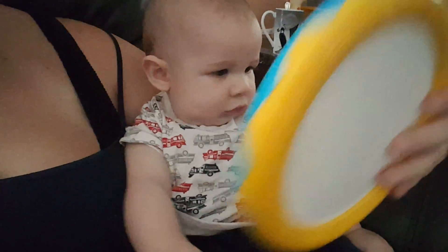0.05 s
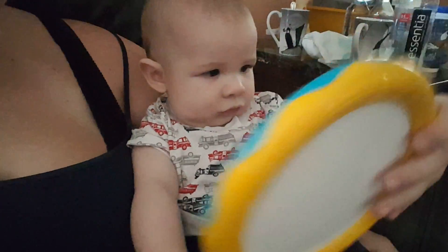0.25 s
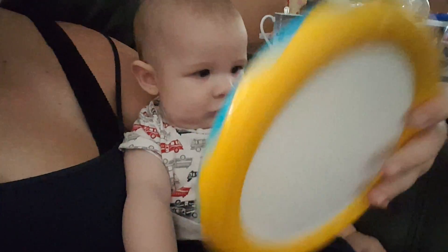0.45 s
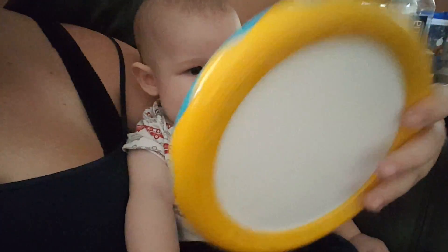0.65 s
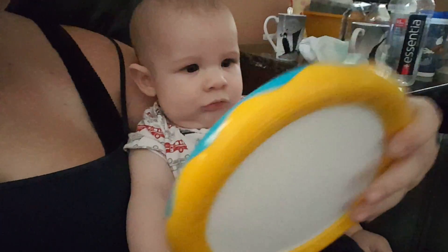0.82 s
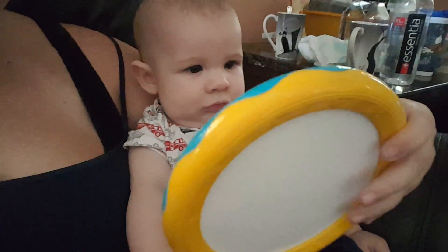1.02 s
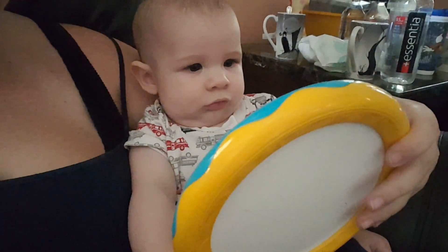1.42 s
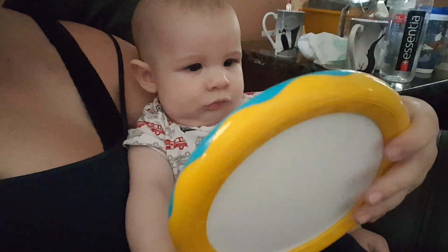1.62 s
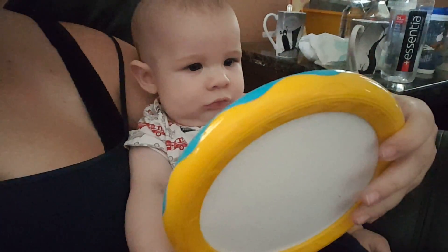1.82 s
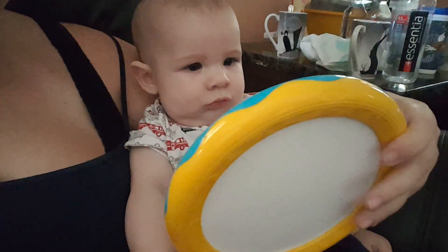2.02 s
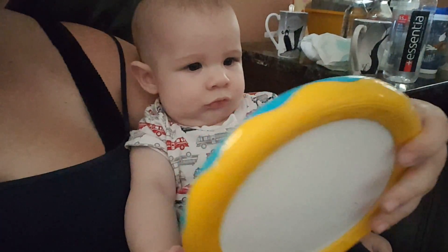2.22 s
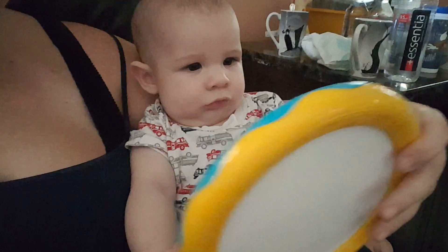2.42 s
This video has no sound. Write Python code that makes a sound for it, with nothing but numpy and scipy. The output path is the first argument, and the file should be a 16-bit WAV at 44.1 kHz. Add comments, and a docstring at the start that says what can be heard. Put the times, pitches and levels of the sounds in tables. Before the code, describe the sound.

A plastic toy rattle is shaken three times close to the microphone, its small beads swishing and pattering against the shell. The beads settle, leaving a quiet small room with a faint appliance hum.

```python
"""A drum-shaped plastic toy rattle is lifted close to the microphone; its beads shift and a few click.
Three shakes follow within a second. Each throws a shower of small beads across the shell: their impacts
excite its modes as a patter, merge into a hiss at full speed and drum on the head as the heap lands.
The toy is then held still and the last beads trickle into place. The small room's reverberation dies
away, leaving the air noise and appliance hum that sound throughout."""
import sys
import numpy as np
from scipy import signal
from scipy.fft import rfft, irfft, next_fast_len
from scipy.io import wavfile
from scipy.ndimage import map_coordinates

SR = 44100
rng = np.random.default_rng(int(sys.argv[2]) if len(sys.argv) > 2 else 0)


def to_wav(s):
    """Save 16-bit WAV."""
    ch = np.atleast_2d(s).T  # columns
    pcm = np.round(np.clip(ch, -1, 1) * 32767)  # PCM
    wavfile.write(sys.argv[1], SR, pcm.astype(np.int16))


N = 112454

# Envelopes of the bead showers: time_s, relative_level_db
LIFT_ENVELOPE = [(0, -56.5), (0.019, -48.5), (.04, -57.5), (.08, -56), (.14, -59)]
PATTER_ENVELOPE = [(.141, -70), (.144, -42), (.16, -45), (.208, -35.5), (.27, -30), (.282, -25.5),
                   (.318, -22.5), (.372, -30), (.41, -38), (.44, -41), (.512, -33.5), (.566, -27.5),
                   (.634, -36.5), (.67, -47), (.716, -56), (.719, -44), (.756, -37), (.805, -31),
                   (.865, -32), (.89, -39.5), (.935, -45), (.968, -53), (.988, -48), (1.035, -62)]
HISS_ENVELOPE = [(.144, -62), (.21, -50), (.294, -28), (.336, -34), (.385, -43), (.415, -53), (.47, -53),
                 (.52, -45), (.565, -34.5), (.635, -51), (.705, -70), (.765, -50), (.82, -37), (.845, -40),
                 (.895, -53), (.925, -55), (.965, -67), (1.03, -78)]
SETTLING_ENVELOPE = [(1.021, -61.5), (1.1, -67), (1.15, -62), (1.22, -67)]
# Landings of the heap on the head: peak_s, relative_level_db
HEAD_LANDINGS = [(.332, -32), (0.611, -38.5), (.845, -42)]
# Clicks of stray beads: start_s, relative_level_db
STRAY_CLICKS = [(0.0128, -40), (0.072, -45.5), (0.142, -44), (.153, -46.5), (0.3253, -24), (.362, -26),
                (0.3939, -36), (0.4297, -28.5), (.4445, -35), (0.9056, -31.5), (0.9305, -46), (0.9892, -45),
                (1.001, -49.5)]
# Spectra of the four kinds of contact: frequency_hz, relative_level_db
PATTER_SPECTRUM = [(200, -28), (600, -9.5), (1100, -4.5), (1450, -0.5), (1900, -1.5), (3000, -0.5),
                   (4000, -5.5), (5600, -9), (7200, -15), (10000, -23), (15000, -54)]
HISS_SPECTRUM = [(1500, -24), (3500, 2.5), (5500, 1.5), (7500, -4.5), (8600, -5), (10000, -7), (11500, -7),
                 (13200, -3.5), (15500, -16.5)]
HEAD_SPECTRUM = [(100, -27), (220, -6), (430, -3), (520, 0.5), (660, 5.5), (900, -1), (1100, -13.5),
                 (1400, 0.5), (2500, -36)]
CLICK_SPECTRUM = [(300, -25), (1400, -14), (3200, -13), (4400, 0), (5400, 1), (7000, -5), (10000, -7),
                  (13000, -5), (15500, -11)]
# Normal modes of the shell: pitch_hz, t60_s, relative_level_db
SHELL_MODES = [(668, 0.05, -0.5), (860, .15, -2), (888.5, 0.2, 2), (1339, 0.18, -1.5), (1420, 0.069, -5),
               (1510, .08, -9), (1659, .12, -29), (2390, 0.24, 0.5), (2670, 0.21, -11.5), (3000, .08, -23),
               (3420, .12, -9), (4440, 0.12, -3), (4730, .08, -9), (5450, 0.082, 1)]
# Likeness at the two microphone ports: frequency_hz, correlation (clipped to -1..1 in use)
RATTLE_CORRELATION = [(200, 1.6), (1400, 0.45), (3300, 0.4), (4300, 0.6), (5300, .5), (6500, -0.14),
                      (15000, -0.05)]
AIR_CORRELATION = [(50, 1), (110, 0.71), (200, 1), (400, -0.008), (700, 0.23), (1300, -0.43), (2400, 0.14),
                   (8000, -0.069)]
# Phase of the rattle between the ports: frequency_hz, left_lead_rad
PORT_PHASE = [(100, -1.5), (700, -0.96), (1000, 1.04), (1550, -0.65), (1850, 3.5), (2700, 3), (3200, 4.5),
              (4200, 4.5), (4900, 8), (6500, 6.5)]
# Balance of the rattle between the ports: frequency_hz, left_minus_right_db
PORT_BALANCE = [(300, 6), (800, 0.5), (1300, 4), (1700, -3), (2800, -4.5), (3700, -4), (4400, -6.5),
                (6200, -5.5), (7500, -2.5), (10000, 1.5), (13500, -3)]
# Reverberation time of the room: frequency_hz, t60_s
ROOM_DECAY = [(200, 0.46), (2000, 0.14), (12000, 0.13)]
# Spectrum of the room air: frequency_hz, relative_level_db
AIR_SPECTRUM = [(20, -16), (35, -34), (52, -12), (85, -11), (126, -12.5), (178, -9.5), (281, -12),
                (340, -6.5), (410, -17), (537, -18.5), (648, -14), (760, -17.5), (1020, -17), (1160, -23.5),
                (1800, -27.5), (2600, -29.5), (3400, -37), (4500, -38.5), (5900, -38), (6400, -43),
                (9000, -42), (10300, -48), (13000, -47), (15500, -50)]
# Partials of the appliance: pitch_hz, level_db, waver_ratio
HUM_PARTIALS = [(57.5, -61, 0.3), (121, -63, 0.3), (174.7, -62, 1), (316, -51.5, 0.27), (640, -61, 0.41)]


def rattle():
    """Superposition: all bead impacts drive one shell, heard a little to the right."""
    body = shell()
    clumps_db = 0.98 * wobble(knots_per_s=220)  # beads arrive in small clumps
    patter = shower(body, PATTER_SPECTRUM, PATTER_ENVELOPE, per_s=4000, scatter_db=3.5,
                    gain_db=0.5 + clumps_db)
    hiss = shower(body, HISS_SPECTRUM, HISS_ENVELOPE, per_s=6000, scatter_db=6.5, gain_db=4 + clumps_db)
    shifting = shower(body, PATTER_SPECTRUM, LIFT_ENVELOPE, per_s=8900, scatter_db=4)
    settling = shower(body, PATTER_SPECTRUM, SETTLING_ENVELOPE, per_s=2100, scatter_db=2)
    beads = patter + hiss + drumming(body) + shifting + settling + stray_beads(body)
    return microphone_ports(beads)


def shower(body, spectrum, envelope, per_s, scatter_db, gain_db=0):
    """Shot noise: faster beads strike harder and more often, per_s times a second at reference_db."""
    reference_db, still_db = -30, -100
    crowding = .6  # exponent relating contact rate to motion
    time_s, level_db = np.transpose(envelope)
    motion_db = np.interp(np.arange(N) / SR, time_s, level_db, still_db, still_db) - reference_db
    chance = np.clip(per_s / SR * amp(crowding * motion_db), 0, 1)
    strengths = unit(amp(scatter_db * np.clip(rng.standard_normal((2, N)), -2, 2)))
    strengths *= rng.choice([-1, 1], (2, N))
    hits = (rng.random((2, N)) < chance) * strengths / np.sqrt(chance)  # unit power at any rate
    hits *= amp(reference_db + gain_db + motion_db)
    return through(flutter(hits), contact(spectrum, body))


def drumming(body, rise_s=.085, fall_s=0.12, depth_db=19.5):
    """Impact excitation: after each throw the heap pours onto the head with a hollow swell."""
    swells = []
    for peak_s, db in HEAD_LANDINGS:
        swells += [(peak_s - rise_s, db - depth_db), (peak_s, db), (peak_s + fall_s, db - depth_db)]
    return shower(body, HEAD_SPECTRUM, sorted(swells), per_s=3300, scatter_db=5)


def stray_beads(body, rise_s=.0005, t60_s=.012):
    """Transient excitation: a lone bead chatters on the shell in a bright, decaying noise burst."""
    bursts = np.zeros((2, N))
    t = np.arange(SR // 20) / SR
    shape = amp(-60 * t / t60_s) * (1 - np.exp(-t / rise_s))
    shape /= shape.max()
    for start_s, db in STRAY_CLICKS:
        start = round(start_s * SR)
        bursts[:, start:start + len(t)] += amp(db) * shape * rng.standard_normal((2, len(t)))
    return through(bursts, contact(CLICK_SPECTRUM, body))


def shell(ring_db=-20.5, echo_db=-12, echo_t60_s=.04):
    """Impulse response of the toy: the bare contact, damped normal modes and echoes between its walls."""
    t = np.arange(SR // 4) / SR
    ring = sum(amp(db - 60 * t / t60) * np.cos(2 * np.pi * hz * t) for hz, t60, db in SHELL_MODES)
    ring /= np.linalg.norm(ring)
    echoes = rng.standard_normal((2, len(t))) * amp(-60 * t / echo_t60_s)
    echoes /= np.linalg.norm(echoes[0])
    return (t == 0) + amp(ring_db) * ring + amp(echo_db) * echoes


def contact(spectrum, body, size=2048):
    """Source and filter: the body's response, of unit energy, to a minimum-phase contact pulse."""
    cepstrum = irfft(np.log(amp(along(spectrum, np.fft.rfftfreq(size, 1 / SR)))))
    cepstrum[1:size // 2] *= 2  # folding onto positive time makes the pulse causal
    cepstrum[size // 2 + 1:] = 0
    pulse = irfft(np.exp(rfft(cepstrum)))
    response = signal.fftconvolve(body, pulse[None], axes=1)
    return response / np.linalg.norm(response, axis=1, keepdims=True)


def flutter(hits, tail_db=-3.5, t60_s=0.038):
    """Diffuse scattering inside the shell gives every impact its own brief tail of noise."""
    decay = amp(-60 * np.arange(SR // 10) / SR / t60_s) ** 2
    power = np.abs(through(hits ** 2, decay / decay.sum()))
    return hits + amp(tail_db) * np.sqrt(power) * rng.standard_normal((2, N))


def microphone_ports(beads):
    """Directional cues: each frequency reaches the two ports with its own level and phase."""
    sides = np.array([[.5], [-.5]])
    return filtered(spread(beads, RATTLE_CORRELATION),
                    lambda hz: amp(sides * along(PORT_BALANCE, hz))
                    * np.exp(1j * sides * along(PORT_PHASE, hz)))


def room(x):
    """Reverberation: a short diffuse tail decays exponentially, the treble first."""
    hz, t, noise = signal.stft(rng.standard_normal((2, SR // 2)), SR, nperseg=256)
    decay = amp(-60 * t / along(ROOM_DECAY, hz)[:, None])
    tail = signal.istft(noise * decay, SR, nperseg=256)[1]
    return through(x, tail / np.linalg.norm(tail[0]))


def appliance_hum():
    """Random modulation: each partial of the hum wavers in amplitude and phase."""
    t = np.arange(N) / SR
    hum = np.zeros(N)
    for hz, db, waver in HUM_PARTIALS:
        modulation = 1 + waver * (wobble(knots_per_s=12) + 1j * wobble(knots_per_s=12))
        hum += amp(db) * unit(np.real(modulation * np.exp(2j * np.pi * hz * t)))
    return hum


def room_air(level_db=-47.5):
    """Stationary noise: the air of the room, strongest in the bass."""
    noise = filtered(rng.standard_normal((2, N)), lambda hz: amp(along(AIR_SPECTRUM, hz)))
    return amp(level_db) * unit(spread(noise, AIR_CORRELATION))


def spread(pair, correlation):
    """Partial coherence: two independent signals mix as mid and side to a given correlation."""
    def angle(hz):
        return np.arccos(np.clip(along(correlation, hz), -1, 1)) / 2
    mid, side = filtered(pair, lambda hz: np.array([np.cos(angle(hz)), np.sin(angle(hz))]))
    return np.array([mid + side, mid - side])


def filtered(x, response):
    """Linear filtering: the spectrum is multiplied by a complex frequency response."""
    size = next_fast_len(N + SR // 2)
    return irfft(rfft(x, size) * response(np.fft.rfftfreq(size, 1 / SR)), size)[..., :N]


def through(x, response):
    """Convolution of both channels with an impulse response."""
    return signal.fftconvolve(x, np.atleast_2d(response), axes=1)[:, :N]


def wobble(knots_per_s):
    """Smooth fluctuation: a spline through random knots."""
    knots = rng.standard_normal(int(N * knots_per_s / SR) + 4)
    return map_coordinates(knots, [np.arange(N) * knots_per_s / SR])


def along(points, hz):
    """Interpolation on a logarithmic frequency axis."""
    frequency_hz, values = np.transpose(points)
    return np.interp(np.log(hz + 1), np.log(frequency_hz + 1), values)


def amp(db):
    """Amplitude ratio of a level in decibels."""
    return 10 ** (np.asarray(db) / 20)


def unit(x):
    """Normalisation to rms 1."""
    return x / np.sqrt(np.mean(x ** 2) + 1e-20)


def scene(reverb_db=-14.5):
    """Superposition of the rattle's direct sound, its reverberation and the background."""
    direct = rattle()
    return direct + amp(reverb_db) * room(direct) + room_air() + appliance_hum()


def record(dry, cutoff_hz=15750):
    """Band limiting: an ideal low-pass filter removes everything above the cutoff."""
    return filtered(dry, lambda hz: hz < cutoff_hz)


dry = scene()
out = record(dry)
to_wav(out)
```